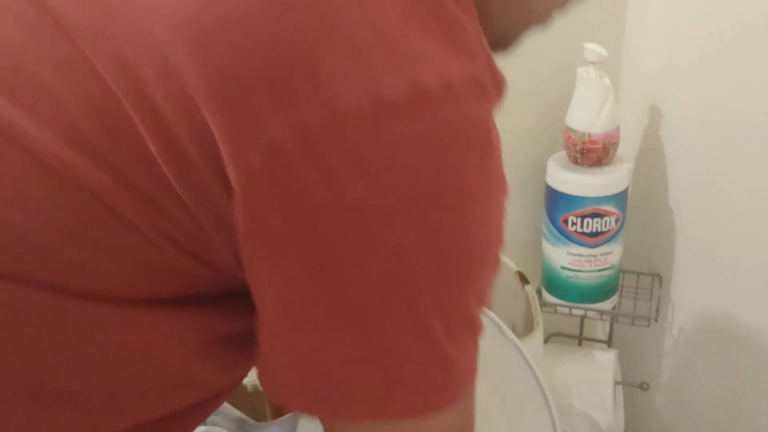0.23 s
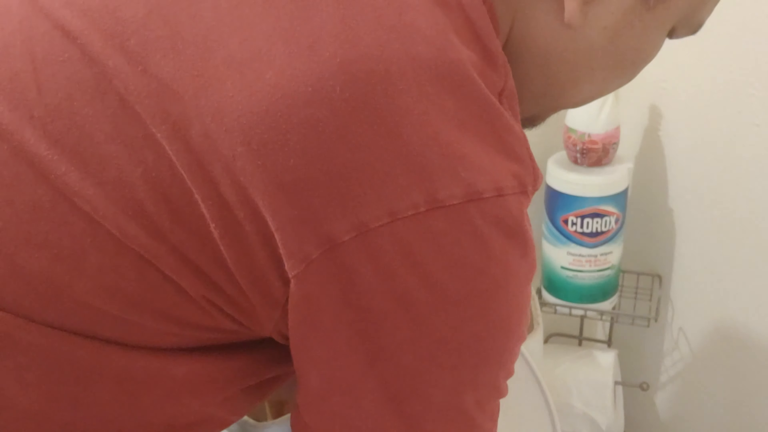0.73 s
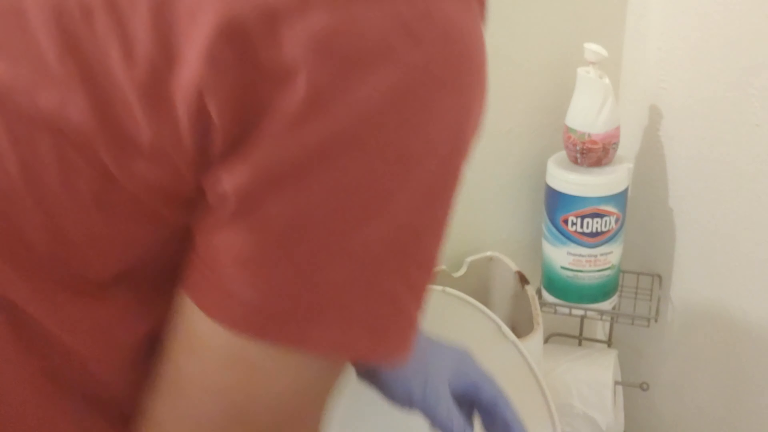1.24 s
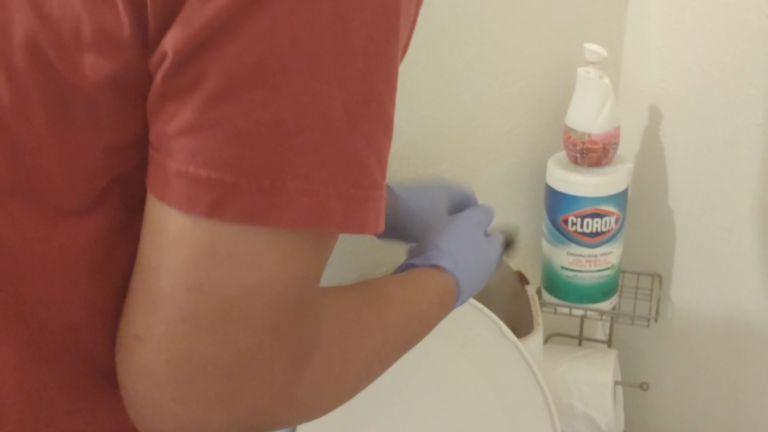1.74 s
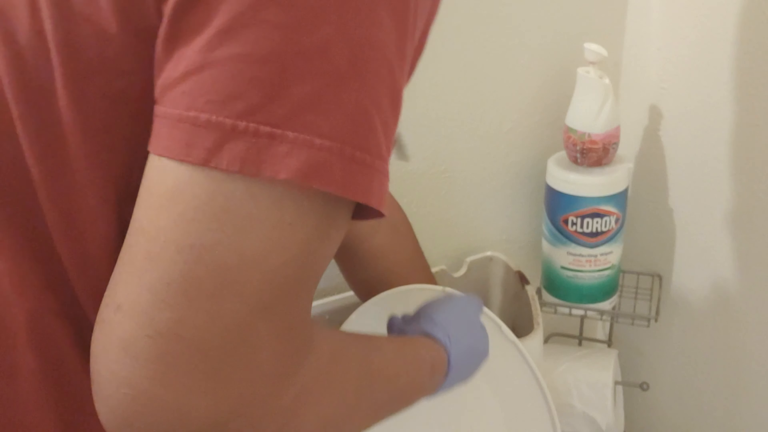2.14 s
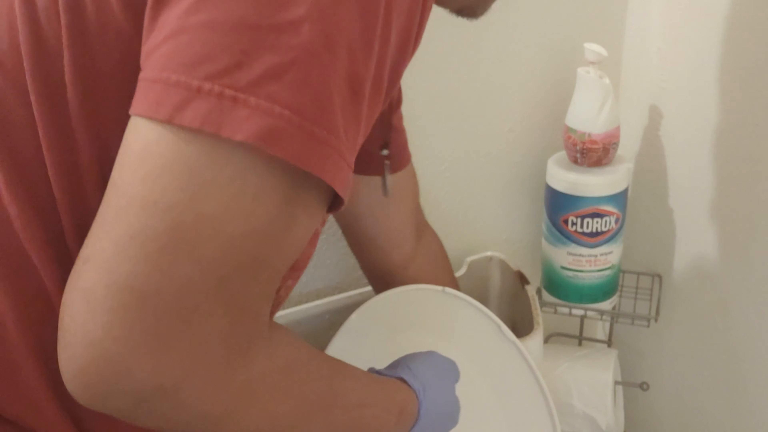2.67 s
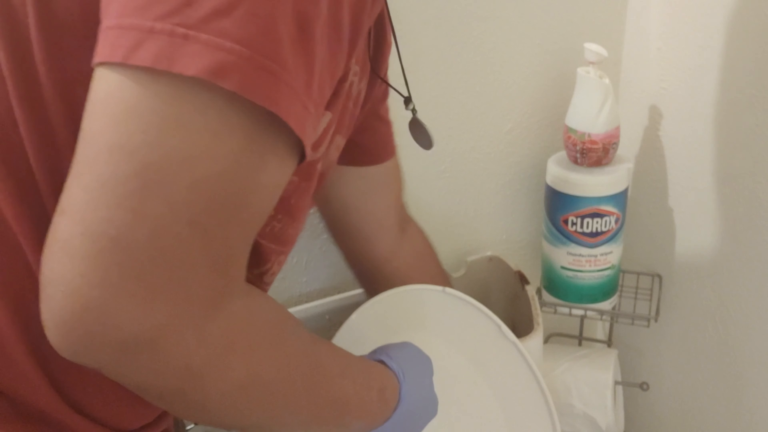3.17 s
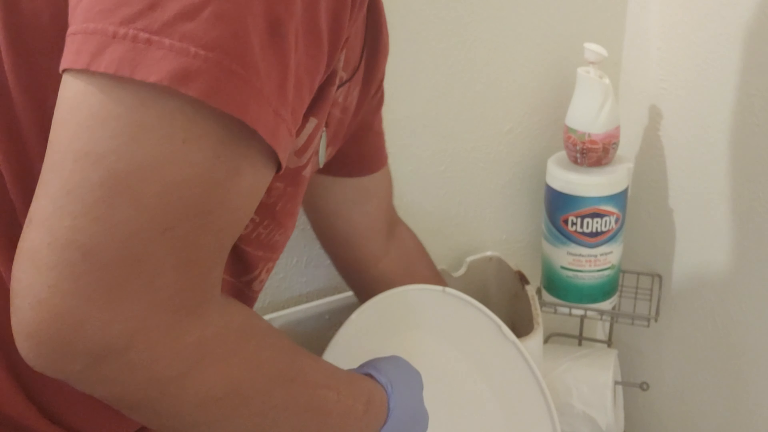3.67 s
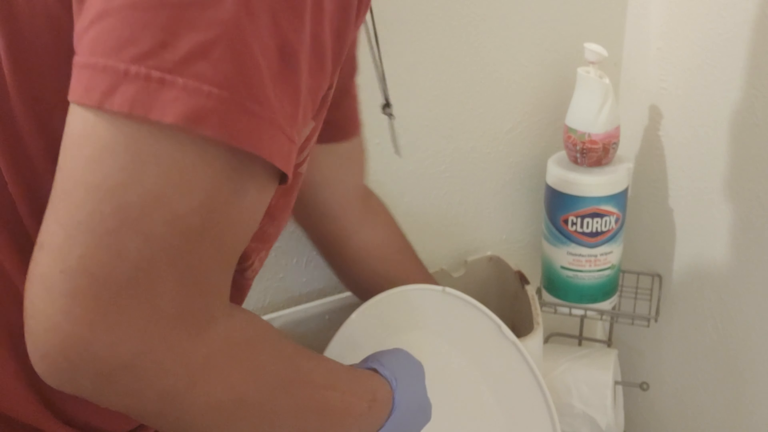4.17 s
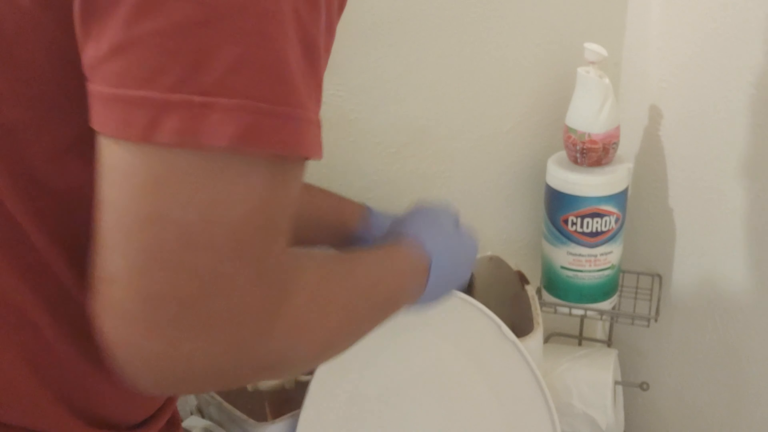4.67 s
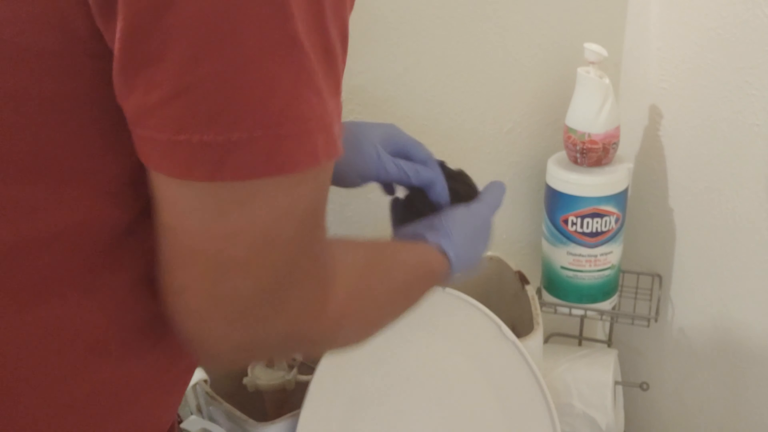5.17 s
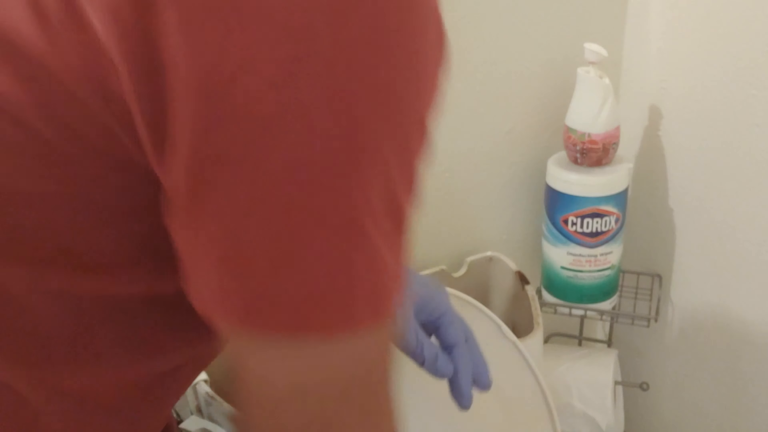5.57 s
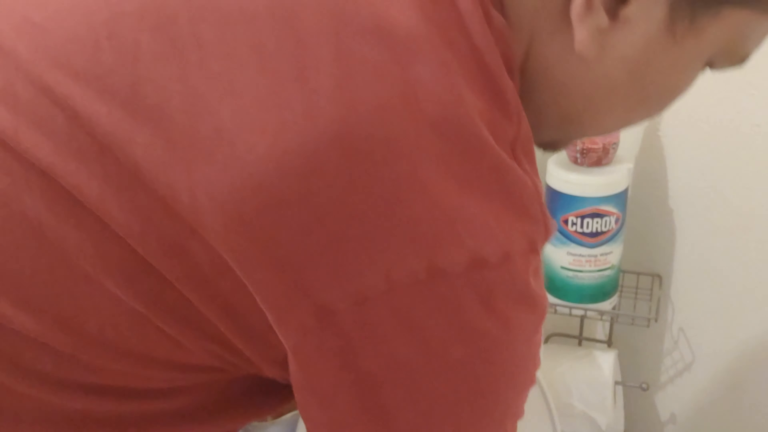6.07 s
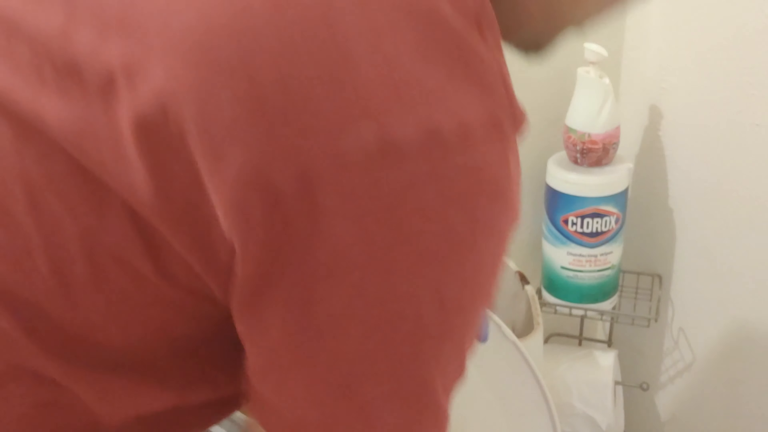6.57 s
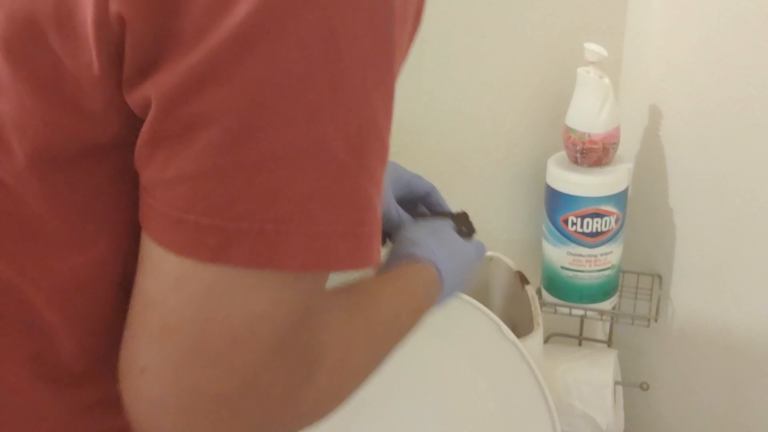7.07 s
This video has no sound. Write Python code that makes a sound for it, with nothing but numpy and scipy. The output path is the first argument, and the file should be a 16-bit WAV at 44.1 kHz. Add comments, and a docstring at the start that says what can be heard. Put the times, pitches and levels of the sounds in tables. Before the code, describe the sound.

A soaked rag is wrung into a bucket with splashing trickles, dabbed with soft hollow ceramic knocks, then wrung again in a small bathroom.

```python
"""Wringing and dabbing a wet rag

A rag is wrung out into a bucket twice and, between, dabbed around a drained ceramic tank in a small
hard-walled bathroom. Bubbles are brief swelling sines; slosh and splash are swarms of ringing clicks.
Spray and fizz are flickering noise, slaps are noise bursts, and a hand sets the tank's modes ringing.
The bucket's air resonates under the stream, the room rings on after it all, and a building hum lies below."""
import sys
import numpy as np
from scipy import signal
from scipy.io import wavfile

SR = 44100
rng = np.random.default_rng(int(sys.argv[2]) if len(sys.argv) > 2 else 0)


def generate_wav(signal):
    """Clip the signal to [-1, 1] and save it as 16-bit WAV at the path in sys.argv[1]."""
    frames = np.transpose(np.atleast_2d(signal))
    scaled = np.clip(frames, -1, 1) * 32767
    pcm = np.round(scaled).astype(np.int16)
    wavfile.write(sys.argv[1], SR, pcm)


def decibels_to_gain(level_db):
    """Convert a level in decibels to a linear amplitude gain (20 dB per decade)."""
    exponent = np.asarray(level_db, float) / 20
    return 10 ** exponent


N = 322399

# half-octave band edges [Hz]
BAND_EDGES_HZ = 22 * 2 ** np.arange(0, 9.7, .5)
# faint dripping that goes on throughout: (time [s], spray level before the room [dB])
DRIP_LEVELS = [(0, -72), (1.9, -74), (2.6, -68.5), (3.2, -91), (3.5, -78), (4.15, -102.5), (4.3, -74),
               (5.8, -62.5), (7.31, -61)]
# hand on the tank wall: (time [s], relative peak [dB], hardness as upper cutoff [Hz])
HAND_KNOCKS = [(1.904, -49, 1500), (3.123, -30, 1540), (3.156, -49, 1470), (3.524, -25.5, 1630),
               (3.890, -26.5, 1500), (4.289, -41.5, 1500)]


def rms_one(x):
    """Scale to unit power."""
    return x / np.sqrt(np.mean(x ** 2) + 1e-20)


def at_hz(points, hz):
    """Read a table on a log-frequency axis."""
    table = np.array(points)
    return np.interp(np.log(hz), np.log(table[:, 0] + 1e-9), table[:, 1])


def cut(x, kind, hz, order=2):
    """Butterworth filter."""
    sections = signal.butter(order, np.clip(hz, 10, .45 * SR), kind, fs=SR, output="sos")
    return signal.sosfilt(sections, x)


def drift(depth_db, rate):
    """A gain that wanders by chance: low-passed noise in dB, rate being its cutoff in Hz."""
    knots_per_s = 40
    knots = rng.standard_normal(int(N / SR * knots_per_s) + 99)
    r = np.exp(-2 * np.pi * rate / knots_per_s)
    slow = rms_one(signal.lfilter([1], [1, -r], knots)[90:])
    return np.interp(np.arange(N) / SR * knots_per_s, np.arange(len(slow)), decibels_to_gain(depth_db * slow))


def ring(clicks, hz, t60):
    """A unit click sets a decaying sine of starting height 1 ringing."""
    r, w = decibels_to_gain(-60 / (t60 * SR)), 2 * np.pi * hz / SR
    return signal.lfilter([0, np.sin(w)], [1, -2 * r * np.cos(w), r * r], clicks + 1e-18)


def resonance(x, hz, width):
    """Two-pole peak with gain 1 on top."""
    r = np.exp(-np.pi * width / SR)
    poles = [1, -2 * r * np.cos(2 * np.pi * hz / SR), r * r]
    return signal.lfilter([(1 - r * r) / 2, 0, (r * r - 1) / 2], poles, x)


def add(out, s, sound):
    """Mix a short sound in at time s."""
    i = int(s * SR)
    out[i:i + len(sound)] += sound[:N - i]


def stereo_noise(length, shape):
    """Half-octave bands of noise, most alike at both ears in the bass; shape(Hz) gives each band's gain."""
    # (frequency [Hz], left-right correlation)
    likeness = [(30, .5), (70, .5), (130, .85), (300, .75), (640, .4), (1400, .1), (8000, 0)]
    # (frequency [Hz], left minus right [dB])
    sides = [(60, 4), (180, 3.5), (550, -2), (1650, -1), (4970, -2.5), (15000, 1.5)]
    settle = 4000   # samples dropped while the filters start
    out, white = 0, rng.standard_normal((2, 2, length + settle))
    for k, (low, high) in enumerate(zip(BAND_EDGES_HZ, BAND_EDGES_HZ[1:])):
        mid, side = cut(white[k % 2], "band", [low, high])[:, settle:]
        hz = np.sqrt(low * high)
        alike = np.clip(at_hz(likeness, hz), -1, 1)
        lean = decibels_to_gain(at_hz(sides, hz) / 2)
        pair = np.sqrt(1 + alike) * mid + np.sqrt(1 - alike) * side * [[1], [-1]]
        out = out + shape(hz) * pair * [[lean], [1 / lean]]
    return out


def hum():
    """A broad building hum of shaped noise, with two wavering narrow bands in it."""
    # (frequency [Hz], relative level per Hz [dB])
    spectrum = [(15, -41), (25, -11), (49, -15), (117, -6), (170, -23), (256, 17.5), (394, -34),
                (695, -0.5), (1160, -12.5), (1840, -14.5), (6740, -27), (11900, -40), (16000, 2)]
    # narrow bands that stand out: (frequency [Hz], width of each of two peaks in a row [Hz], level [dB])
    drones = [(127, 18, -80), (253, 7, -75)]
    hum_db = -67.5
    broad = stereo_noise(N, lambda hz: decibels_to_gain(at_hz(spectrum, hz)) * drift(1.5, 2))
    out = decibels_to_gain(hum_db) * rms_one(broad)
    for hz, width, db in drones:
        band = resonance(resonance(rng.standard_normal(N), hz, width), hz, width)
        out = out + decibels_to_gain(db) * drift(2.5, 2) * rms_one(band)
    return out


def curve(t, s, db):
    """A level joined by straight lines, silent outside its span."""
    return np.interp(t, s, db, left=-150, right=-150)


def surge(t, s, db, fade_s, rise):
    """A level that swells to its top and fades, both straight in dB; one row per event."""
    late = (t - s[:, None]) / np.maximum(fade_s, .01)[:, None]
    return db[:, None] - 30 * np.where(late < 0, -late / rise, late)


def blend(t, levels_db, pitches_hz):
    """Overlapping parts add in power; the pitch is their power-weighted mean on a log axis."""
    power = decibels_to_gain(np.vstack(levels_db)) ** 2 + 1e-30
    total = power.sum(axis=0)
    hz = np.exp(np.sum(power * np.log(np.vstack(pitches_hz)), axis=0) / total)
    return [np.interp(np.arange(N) / SR, t, c) for c in (10 * np.log10(total), hz)]


def swarm(level_db, centre_hz, octaves, per_s, low_hz, high_hz, cycles, spread_db, clump_db):
    """Small bubbles born at random ring at 14 pitches, strongest near the centre; each pitch comes in clumps."""
    sizes = decibels_to_gain(spread_db * np.minimum(rng.exponential(1, N), 4)) * rng.choice([-1, 1], N)
    born = decibels_to_gain(level_db) * rms_one(sizes * (rng.random(N) < per_s / SR))
    pitches = np.geomspace(low_hz, high_hz, num=14)
    dealt = rng.integers(0, 14, N)
    centre, out = np.log2(centre_hz), 0
    for k, hz in enumerate(pitches):
        off = ((np.log2(hz) - centre) / octaves) ** 2
        even = np.sqrt(28 * hz / (cycles * SR))   # makes up for the length of the ring
        clicks = born * (dealt == k) / (1 + off * off) * drift(clump_db, 10) * even
        # the band filter softens the click at birth
        out = out + cut(ring(clicks, hz, cycles / hz), "band", [hz / 1.147, hz * 1.85], order=1)
    return out


def slosh():
    """Larger bubbles swarm as water heaves, as each knock stirs the water at the wall, and in the dripping."""
    # surges: (time of top [s], level [dB], commonest pitch [Hz], fade by 30 dB [s], 0.01 at least)
    surges = [(.37, -37, 820, -0.05), (.71, -49, 990, -0.5), (0.898, -29.5, 482, 0.31),
              (1.14, -38, 900, 0.25), (1.3, -39, 570, 0.27), (1.588, -44.5, 674, 0.28),
              (2.279, -46.5, 812, 0.43), (2.36, -46, 645, 0.6), (2.48, -61, 610, 0.8),
              (2.58, -46, 533, 0.47), (2.71, -44.5, 510, 0.33), (3.02, -66, 403, -0.3),
              (3.3, -60, 496, 2.8), (4.232, -38.5, 637, .12), (4.35, -51, 468, .8),
              (4.76, -53.5, 650, 0.74), (4.93, -48.5, 655, 0.2), (5.19, -48.5, 521, 0.1),
              (5.891, -46, 670, 0.21), (5.959, -39.5, 743, 0.1956), (6.21, -45, 400, 0.1),
              (6.291, -26.5, 407, 0.07), (6.5, -33, 360, 0.07), (6.599, -26, 587, 0.1138),
              (6.78, -44.5, 866, 0.43), (7.3, -55, 407, .3)]
    t = np.arange(0, N / SR, .002)
    flat, drip = np.ones_like(t), np.interp(t, *np.transpose(DRIP_LEVELS))
    s, db, hz, fade = np.transpose(surges)
    heaved = surge(t, s, db, fade, 0.59)   # rise as a share of the fade
    hit_s, hit_db, _ = np.transpose(HAND_KNOCKS)
    lag_s, stir_db, stir_hz, stir_fade_s = 0.019, -2, 733, 0.12
    stirred = surge(t, hit_s + lag_s, hit_db + stir_db, np.full_like(hit_s, stir_fade_s), 0.23)
    drip_db, drip_hz = 1.5, 467   # level relative to the drip spray
    level_db, pitch_hz = blend(t, [heaved, stirred, drip + drip_db],
                               [hz[:, None] * flat, np.full_like(stirred, stir_hz), drip_hz * flat])
    return swarm(level_db, pitch_hz, octaves=0.23, per_s=400, low_hz=296, high_hz=1059,
                 cycles=9.5, spread_db=3.3, clump_db=1.0)


def spray(level_db, grain_db=3.5, flicker_db=5.0):
    """Dense fine droplets burst all over: uneven clicks, unrelated at the two ears, each band flickering."""
    # (frequency [Hz], relative level per Hz [dB])
    spectrum = [(2650, -31), (4500, -7.5), (5420, -15), (7900, -5), (9310, -13.5), (11600, -12),
                (15200, -27.5), (16000, -22)]
    sizes = grain_db * np.minimum(rng.exponential(1, (2, 1, N)), 5)
    out, clicks = 0, rng.standard_normal((2, 2, N)) * decibels_to_gain(sizes)
    for k, (low, high) in enumerate(zip(BAND_EDGES_HZ[15:], BAND_EDGES_HZ[16:])):
        gain = decibels_to_gain(at_hz(spectrum, np.sqrt(low * high))) * drift(flicker_db, 33)
        out = out + gain * cut(clicks[k % 2], "band", [low, high])
    return decibels_to_gain(level_db) * rms_one(out)


def splash_and_spray():
    """Streams, thrown handfuls and dripping drive a swarm of small bubbles and, alongside, fine spray."""
    # the stream from the wrung rag, one list per wringing:
    # (time [s], splash level [dB], commonest bubble pitch [Hz], spray level [dB])
    streams = [
        [(.42, -45, 4000, -56), (.53, -54, 4270, -40.5), (.65, -36, 1720, -44), (.71, -31.5, 2680, -37.5),
         (.85, -37, 2480, -42), (.95, -38.5, 1900, -42.5), (1.08, -37.5, 2670, -46), (1.17, -39, 1280, -41.5),
         (1.28, -49.5, 2860, -45), (1.4, -46, 2450, -47.5), (1.6, -65, 1800, -58.5), (1.83, -85, 3000, -68)],
        [(5.84, -67.5, 2650, -78), (5.88, -40, 3200, -45.5), (5.94, -32.5, 4360, -45.5), (6.02, -38, 1900, -39),
         (6.13, -32.5, 2670, -41), (6.27, -34, 2020, -40.5), (6.41, -38, 3350, -46), (6.5, -37.5, 3100, -45),
         (6.57, -36.5, 1480, -51), (6.68, -42, 2700, -42.5), (6.78, -44.5, 3700, -49.5),
         (6.85, -53, 2520, -47.5), (7.0, -75, 3800, -59)],
    ]
    # water thrown up by a dab or a squeeze: (time of top [s], splash level [dB],
    # commonest bubble pitch [Hz], spray level [dB], fade by 30 dB [s], 0.01 at least)
    handfuls = [(0.238, -35.5, 2670, -47.5, 0.16), (.39, -48.5, 3300, -53, 1.75),
                (1.93, -53, 1250, -60, 0.02), (2.278, -56, 1920, -63, 0.67),
                (2.359, -45.5, 2190, -47.5, 0.23), (2.48, -58.5, 2230, -58.5, 0.5),
                (2.698, -58, 2220, -77, 1.04), (3.133, -49, 1780, -58, 0.29),
                (3.538, -41, 2400, -56.5, .09), (3.909, -51.5, 2090, -66, 0.18),
                (4.23, -42, 3650, -50, -0.07), (4.32, -52, 2300, -54, 0.58), (4.739, -50, 1460, -54, 0.49),
                (4.93, -39, 3550, -60, -0.21), (5.19, -47, 1770, -65, -0.13), (5.54, -75, 2850, -45, -0.25),
                (5.96, -32, 2650, -33, 0.1466), (6.602, -22.5, 2200, -64, -0.14)]
    # small bubbles: (births [per s], lowest pitch [Hz], highest pitch [Hz], cycles to fall 60 dB,
    # size spread [dB], clumping [dB])
    small_bubbles = (800, 1300, 5600, 36, 4, 3.5)
    t = np.arange(0, N / SR, .002)
    flat, drip = np.ones_like(t), np.interp(t, *np.transpose(DRIP_LEVELS))
    rise = 0.47   # share of the fade
    drip_db, drip_hz = -1, 2850   # level relative to the drip spray
    s, db, hz, fine_db, fade = np.transpose(handfuls)
    splash = [surge(t, s, db, fade, rise), drip + drip_db]
    pitch = [hz[:, None] * flat, drip_hz * flat]
    fine = [surge(t, s, fine_db, fade, rise), drip]
    for stream in streams:
        s, db, hz, fine_db = np.transpose(stream)
        splash.append(curve(t, s, db))
        pitch.append(np.interp(t, s, hz))
        fine.append(curve(t, s, fine_db))
    level_db, pitch_hz = blend(t, splash, pitch)
    spray_db, _ = blend(t, fine, [np.ones_like(np.vstack(fine))])   # spray has no pitch
    return swarm(level_db, pitch_hz, 1.0, *small_bubbles), spray(spray_db)


def bubbles(rise=0.041, swell_cycles=2.47):
    """Each is a sine that swells within a few cycles and dies; its pitch climbs as it nears the surface."""
    # the clearest single bubbles and plops:
    # (time [s], level if spread over 40 ms [dB], starting pitch [Hz], cycles to fall 60 dB)
    plops = [(0.174, -47.5, 2880, 42), (0.175, -48.5, 6460, 27), (0.21, -47, 1390, 170),
             (0.272, -42, 8800, 32), (0.376, -43, 5000, 11), (0.474, -39.5, 3610, 30),
             (0.488, -42, 10700, 120), (0.549, -39.5, 3240, 11), (0.556, -41.5, 5400, 30),
             (0.576, -54.5, 1900, 66), (0.641, -46, 1140, 43), (0.659, -40, 1814, 100),
             (0.761, -44.5, 1140, 14), (0.765, -40, 1710, 68), (0.819, -48.5, 471, 140),
             (0.84, -41.5, 2830, 20), (0.932, -39, 548, 154), (1.034, -42, 2320, 40), (1.042, -36, 883, 18),
             (1.096, -36.5, 3400, 15), (1.134, -39.5, 1140, 5.3), (1.212, -55, 1530, 36),
             (1.267, -39.5, 507, 31), (1.327, -54, 494, 48), (1.361, -48.5, 1930, 190),
             (1.372, -48.5, 2970, 33), (1.438, -41, 2220, 180), (1.489, -50.5, 1590, 99),
             (1.502, -54.5, 610, 44), (1.562, -46, 707, 48), (1.912, -53.5, 954, 43), (2.257, -58, 780, 17),
             (2.26, -60, 1800, 36), (2.344, -57, 1606, 210), (2.343, -52, 3660, 56), (2.35, -52, 2190, 50),
             (2.474, -49, 2430, 95), (2.474, -55, 1320, 21), (2.527, -60, 680, 30), (2.54, -57, 484, 51),
             (2.58, -58.5, 6380, 48), (2.633, -56.5, 253, 31), (2.661, -61, 1316, 51),
             (2.67, -59, 4700, 17), (2.755, -59.5, 590, 22), (2.974, -59.5, 256, 21),
             (3.176, -43.5, 478, 120), (3.201, -53, 254, 13), (4.226, -49.5, 3605, 230),
             (4.293, -47, 260, 40), (4.692, -52.5, 5930, 15), (4.695, -39, 1800, 100),
             (4.709, -49, 1433, 100), (4.738, -49, 1273, 120), (4.776, -52, 5700, 71),
             (4.816, -59, 5000, 70), (4.874, -52, 860, 24), (4.883, -49.5, 2200, 110),
             (4.894, -44, 4300, 4.3), (4.901, -47.5, 619, 58), (4.933, -49.5, 880, 41),
             (4.965, -53, 4930, 60), (5.011, -41.5, 3025, 96), (5.016, -47, 3570, 24),
             (5.185, -53, 5430, 79), (5.508, -63, 1860, 83), (5.51, -59, 3830, 55), (5.605, -52, 9370, 79),
             (5.75, -56.5, 6100, 13), (5.877, -41, 2210, 130), (5.883, -41.5, 4460, 18),
             (5.912, -48, 596, 70), (5.918, -46.5, 1000, 8.3), (5.954, -30, 5100, 17),
             (5.99, -31, 1846, 55), (6.163, -37.5, 2900, 9), (6.163, -49, 1140, 13),
             (6.171, -45.5, 250, 83), (6.18, -39.5, 424, 27), (6.186, -40, 1835, 110),
             (6.216, -36.5, 380, 19), (6.241, -38, 1890, 37), (6.282, -44, 5740, 20), (6.317, -38, 325, 95),
             (6.333, -38.5, 3960, 21), (6.365, -37.5, 336, 52), (6.421, -40.5, 336, 47),
             (6.498, -39, 363, 19), (6.543, -42, 1260, 13), (6.548, -42, 429, 69), (6.55, -44.5, 4050, 44),
             (6.559, -38, 631, 48), (6.588, -37, 2330, 46), (6.6, -49, 1440, 60), (6.634, -45.5, 600, 56),
             (6.734, -41, 3720, 15), (6.784, -51, 935, 33), (6.856, -55.5, 2760, 44),
             (6.862, -52.5, 9250, 53), (6.949, -52.5, 7640, 9.7), (7.063, -49, 6530, 13),
             (7.272, -49.5, 2564, 160)]
    out = np.zeros(N)
    for s, level_db, hz, cycles in plops:
        t60 = max(cycles, 2) / hz
        t = np.arange(int(t60 * SR) + 1) / SR
        swell = np.sin(np.pi / 2 * np.minimum(t * hz / swell_cycles, 1)) ** 2
        tone = swell * decibels_to_gain(-60 * t / t60) * np.sin(2 * np.pi * hz * (1 + rise * t / t60) * t)
        add(out, s, decibels_to_gain(level_db) * tone * np.sqrt(.04 * SR / np.sum(tone ** 2)))
    return out


def slaps(t60=0.0096, dull_hz=7000, level_db=6.5):
    """Water or wet rag slaps as a burst of noise; larger masses of water reach lower."""
    # (time [s], relative level [dB], lower cutoff [Hz])
    hits = [(0.175, -28, 1790), (0.217, -27.5, 1180), (0.271, -24, 3560), (.487, -29.5, 1090),
            (0.55, -41, 2490), (.655, -18.5, 1620), (0.834, -18, 1950), (1.093, -22, 2500),
            (1.171, -20, 1990), (1.268, -28.5, 295), (1.64, -37, 3500), (2.345, -31, 1240),
            (4.214, -41, 3020), (4.288, -29.5, 1000), (4.85, -31.5, 5160), (4.881, -31, 493),
            (5.511, -35.5, 900), (5.858, -36.5, 4000), (5.878, -40, 1800), (5.955, -40.5, 3500),
            (6.102, -22.5, 1500), (6.182, -26.5, 250), (6.29, -20, 4000), (6.546, -35.5, 600),
            (6.762, -24.5, 5000), (7.059, -39, 4000)]
    out, t = np.zeros(N), np.arange(2000) / SR
    for (s, peak_db, low_hz), noise in zip(hits, rng.standard_normal((len(hits), 2000))):
        burst = cut(noise * decibels_to_gain(-60 * t / t60), "high", low_hz)
        add(out, s, decibels_to_gain(peak_db + level_db) * cut(burst, "low", dull_hz, order=1))
    return out


def bucket(x):
    """While the stream falls in, the bucket's air column rings on at its modes."""
    # air column: (frequency [Hz], width [Hz], gain over the direct sound [dB])
    modes = [(1140, 10, 19), (1452, 6, 9.5), (1890, 8.3, -2.5), (2271, 13, 10), (2842, 103, -0.5)]
    # the stream falls into the bucket: (start [s], end [s])
    wringing = [(.55, 1.45), (5.85, 7.0)]
    t = np.arange(N) / SR
    ramp_s = 0.11
    inside = x * sum(np.clip(np.minimum(t - a, b - t) / ramp_s, 0, 1) for a, b in wringing)
    out = x
    for k, (hz, width, db) in enumerate(modes):
        out = out + (-1) ** k * decibels_to_gain(db) * resonance(inside, hz, width)
    return out


def knocks(level_db=5, contact_s=0.0042, wall_hz=420):
    """A wet hand lands as a few ms of dulled noise; it strikes every mode with a strength of its own."""
    # the tank: (frequency [Hz], relative level [dB], time to fall 60 dB [s])
    tank = [(494, -10, 0.23), (595, -13, 0.14), (717, -7.5, 0.2), (790.5, 8, 0.21), (812, -0.5, 0.31),
            (830, -19.5, 0.25), (900, -12.5, 0.058), (1480, -42, 0.029), (1900, -12.5, 0.069),
            (2650, -13.5, 0.056), (3850, -14.5, 0.017), (3950, -17, 0.04), (4570, -36, 0.029),
            (6560, -23, 0.016)]
    out, t = np.zeros(N), np.arange(SR // 3) / SR
    luck = rng.normal(0, 2, (len(HAND_KNOCKS), len(tank)))   # dB
    noises = rng.standard_normal((len(HAND_KNOCKS), len(t)))
    for (s, peak_db, hard_hz), own_db, noise in zip(HAND_KNOCKS, luck, noises):
        push = cut((1.0 + noise) * np.exp(-t / contact_s), "band", [wall_hz, hard_hz], order=1)
        body = sum(decibels_to_gain(db + d) * rms_one(ring(push, hz, t60)) for (hz, db, t60), d in zip(tank, own_db))
        add(out, s, decibels_to_gain(peak_db + level_db) * body / np.abs(body).max())
    return cut(out, "high", wall_hz, order=4)   # the stiff wall gives little bass


def fizz():
    """The soaked rag is lifted and folded, fizzing: spray without its lower part, so finer."""
    # (time [s], level before the low cut [dB])
    levels = [(4.19, -82), (4.22, -58), (4.32, -50.5), (4.52, -46.5), (4.62, -60.5), (4.74, -44.5),
              (4.82, -58), (5.03, -58.5), (5.13, -93)]
    level_db = curve(np.arange(N) / SR, *np.transpose(levels))
    return cut(spray(level_db), "high", 5600, order=4)


def bathroom(x):
    """A weak direct sound, then dense reflections that die band by band; every call is another spot."""
    # (frequency [Hz], time to fall 60 dB [s])
    room_t60 = [(200, 0.28), (600, 0.19), (2000, 0.18), (5000, 0.26), (12000, 0.11)]
    direct_db, right_lag, build_up_s, radiates_hz = -8.5, 3, 0.0012, 217   # lag in samples
    t = np.arange(SR * 2 // 5) / SR

    def fade(hz):
        t60 = at_hz(room_t60, hz)
        return decibels_to_gain(-60 * t / t60) / np.sqrt(t60)

    echo = stereo_noise(len(t), fade) * (1 - np.exp(-t / build_up_s))
    echo /= np.sqrt(np.mean(np.sum(echo ** 2, axis=1)))
    echo[[0, 1], [0, right_lag]] += decibels_to_gain(direct_db)
    small = cut(x, "high", radiates_hz, order=4)   # small sources radiate little bass
    return signal.fftconvolve(np.atleast_2d(small), echo, axes=1)[:, :N]


def scene():
    """Water, rag and tank in the room, over the building's hum."""
    splash, fine_spray = splash_and_spray()
    water_spot = bucket(slosh() + splash + slaps()) + fine_spray + fizz()
    tank_spot = bucket(bubbles()) + knocks()
    return bathroom(water_spot) + bathroom(tank_spot) + hum()


def band_limit(x):
    """A steep low-pass at the top of the band."""
    return signal.sosfilt(signal.butter(12, 16630, fs=SR, output="sos"), x)


def record(dry):
    """Returns the finished mix as it is heard."""
    return band_limit(dry)


dry = scene()
out = record(dry)
generate_wav(out)
```